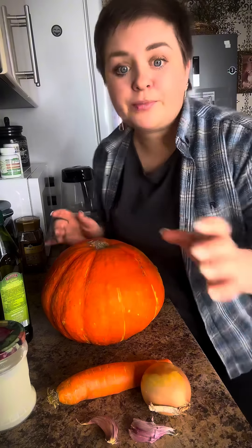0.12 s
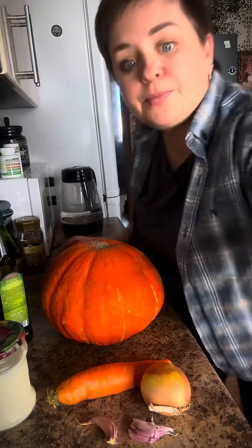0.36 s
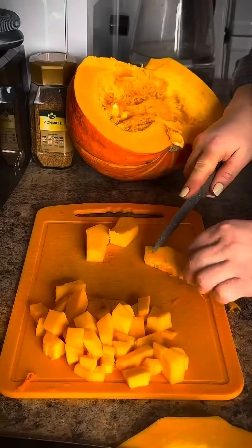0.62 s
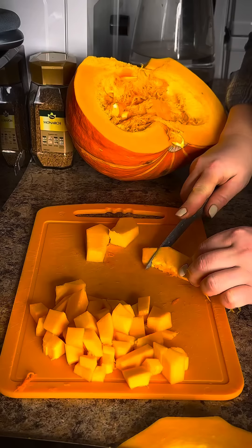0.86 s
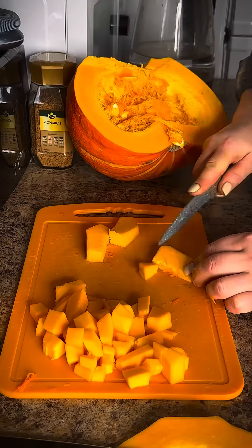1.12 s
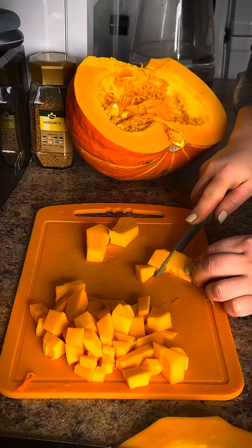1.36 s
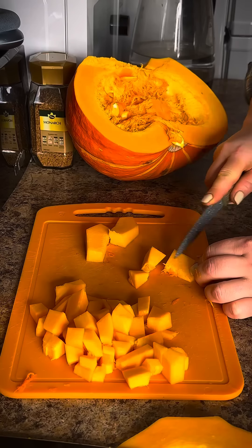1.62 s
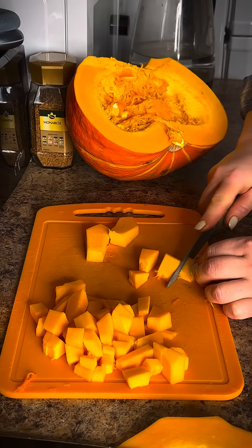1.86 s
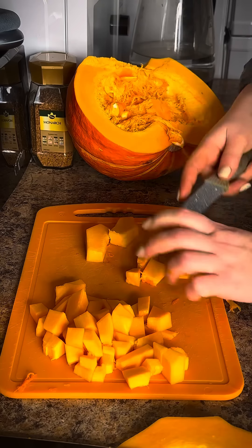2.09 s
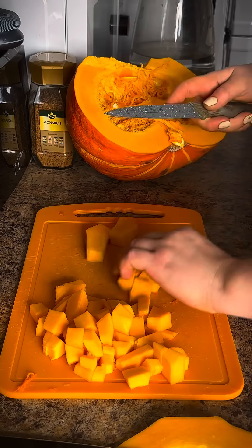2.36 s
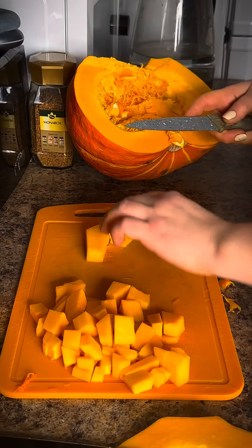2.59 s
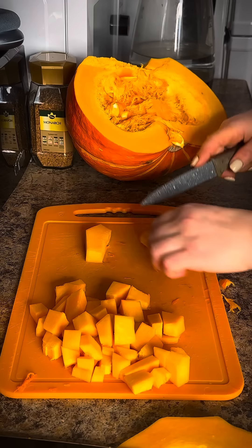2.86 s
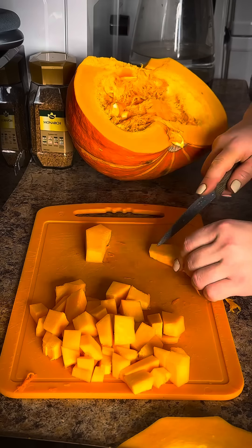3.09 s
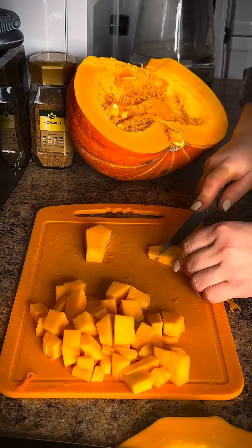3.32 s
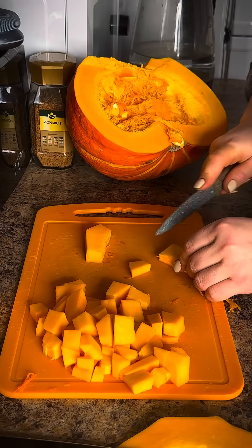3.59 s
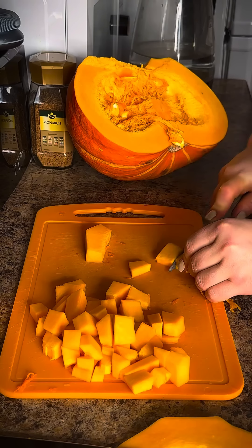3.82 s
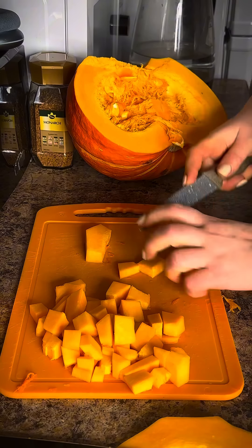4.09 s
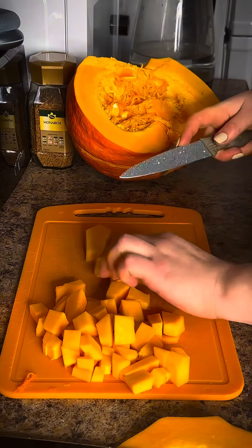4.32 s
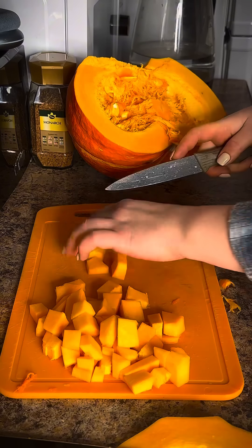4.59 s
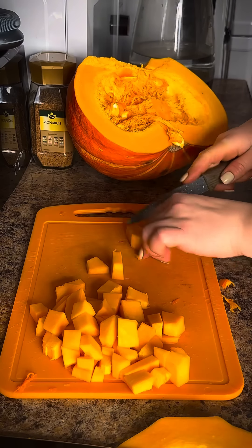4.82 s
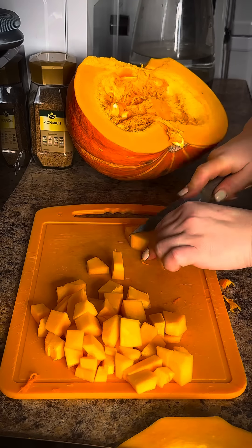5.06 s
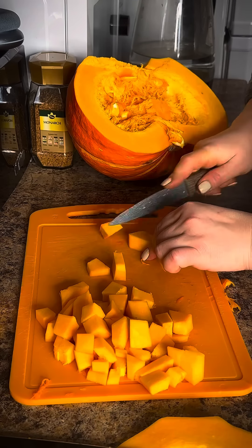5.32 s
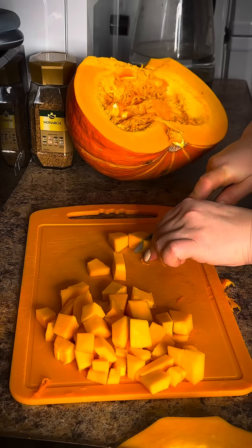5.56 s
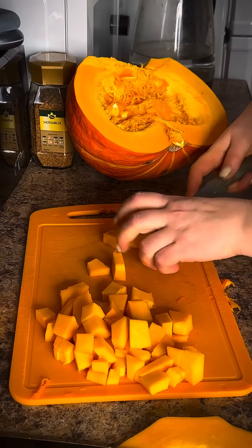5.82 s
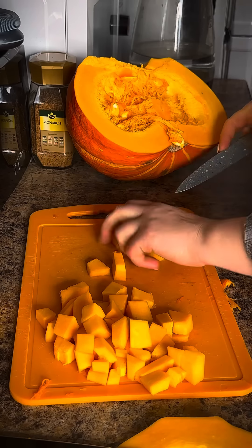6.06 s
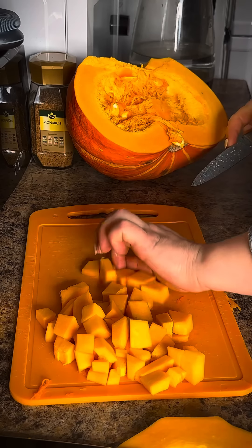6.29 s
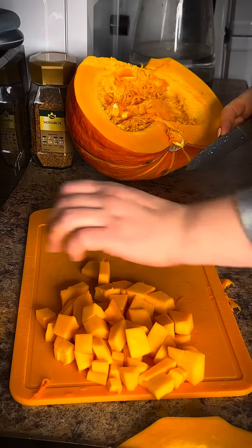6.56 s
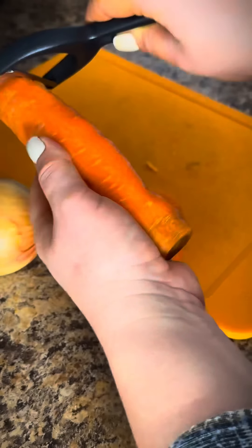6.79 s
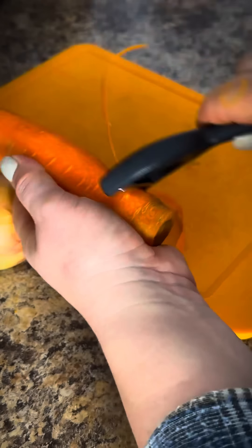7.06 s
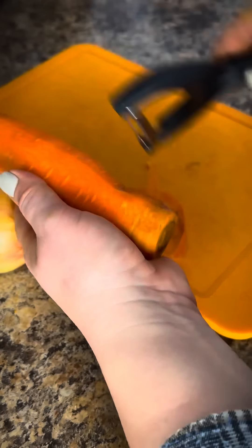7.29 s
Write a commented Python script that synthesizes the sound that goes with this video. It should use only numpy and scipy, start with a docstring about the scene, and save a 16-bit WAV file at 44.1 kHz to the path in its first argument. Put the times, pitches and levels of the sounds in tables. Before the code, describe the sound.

A knife chops firm vegetable on a plastic board with hollow knocks, pieces sliding between, then a peeler rasps once along a carrot in a quiet kitchen.

```python
"""A knife dices firm vegetable on a plastic board: each blow rings the board's modes as decaying sines.
Stick-slip grains make the blade's rasp and the sliding of pieces; soft drops, ticks and hiss lie between.
A peeler then gives a touch and one long stroke of dense tearing grains, and a falling squeak.
A small kitchen adds its diffuse tail; dull bumps come through the counter over air noise and a faint hum.
Two close microphone ports hear it, after an early cut from a wider shot to the board."""
import sys
import numpy as np
from scipy import signal
from scipy.fft import rfft, irfft
from scipy.io import wavfile

SR = 44100
rng = np.random.default_rng(int(sys.argv[2]) if len(sys.argv) > 2 else 0)


def master_out(mix):
    """Clip the mix to full scale and print it as 16-bit PCM to the path in sys.argv[1]."""
    frames = np.transpose(np.atleast_2d(mix))
    ceiling = np.clip(frames, -1, 1)
    pcm = np.round(ceiling * 32767).astype(np.int16)
    wavfile.write(sys.argv[1], SR, pcm)


def level_to_linear(level):
    """Convert decibel levels to linear amplitude factors, elementwise."""
    exponent = np.asarray(level, float) / 20
    return 10 ** exponent


N = 327222   # length [samples]
CLOSE_SHOT_S = .572   # the scene cuts to a closer microphone position at the board


def rms_one(x):
    """Power normalisation: scales a signal to rms 1."""
    return x / np.sqrt(np.mean(x ** 2) + 1e-20)


def at_hz(points, hz):
    """Logarithmic pitch scale: interpolates a table's second column over log frequency."""
    points = np.array(points)
    return np.interp(np.log(hz), np.log(points[:, 0]), points[:, 1])


def bin_hz():
    """Fourier analysis: bin frequencies [Hz], kept above zero for the logarithm."""
    return np.maximum(np.fft.rfftfreq(N, 1 / SR), 1)


def low_pass(x, hz, order=2):
    """Low-pass filtering: a Butterworth slope above hz."""
    return signal.sosfilt(signal.butter(order, hz, fs=SR, output="sos"), x)


def band_pass(x, low_hz, high_hz, order):
    """Band-pass filtering: Butterworth slopes on both sides."""
    return signal.sosfilt(signal.butter(order, [low_hz, high_hz], "band", fs=SR, output="sos"), x)


def fading(bursts, time_s):
    """Exponential decay: each click falls to 1/e of its height in time_s."""
    return signal.lfilter([1], [1, -np.exp(-1 / (time_s * SR))], bursts + 1e-18)


def drift(rate_hz):
    """Slow random modulation: twice low-passed noise of rms 1, made at every 20th sample."""
    pole = np.exp(-40 * np.pi * rate_hz / SR)
    noise = rng.standard_normal(N // 20 + 2002)
    slow = signal.lfilter([1], [1, -2 * pole, pole * pole], noise)[2000:]
    return np.interp(np.arange(N) / 20, np.arange(len(slow)), rms_one(slow))


def ring(clicks, hz, t60):
    """Modal resonance: a unit click sets off a sine of height 1 that falls 60 dB in t60 [s]."""
    radius, angle = level_to_linear(-60 / (t60 * SR)), 2 * np.pi * hz / SR
    return signal.lfilter([0, np.sin(angle)], [1, -2 * radius * np.cos(angle), radius ** 2], clicks + 1e-18)


def grains(per_s, spread_db):
    """Stick-slip friction: clicks of random time, sign and size."""
    sizes = level_to_linear(spread_db * np.minimum(rng.exponential(1, N), 5)) * rng.choice([-1, 1], N)
    return sizes * (rng.random(N) < per_s / SR)


def coloured(x, spectrum):
    """Spectral shaping: filters a noisy signal by a spectrum and scales it to rms 1."""
    return rms_one(irfft(rfft(x) * level_to_linear(at_hz(spectrum, bin_hz())), N))


def stroke(start, length, shares, db, touch_s=0.004, leave_s=0.073):
    """Contact force as gain: levels in dB at shares of the length, joined to silence at either edge."""
    s = start + length * np.maximum.accumulate(np.clip(shares, 0, 1))
    times = np.r_[start - touch_s, s, s[-1] + leave_s]
    return level_to_linear(np.interp(np.arange(N) / SR, times, np.r_[-110, db, -110]))


# modes of the board on its counter, also excited by taps and rubbing:
# (frequency [Hz], relative level [dB], t60 when left free [s])
BOARD_MODES = [(113, -25, 0.025), (279.7, -22, 0.25), (454, -6.5, 0.024), (675.8, 0, 0.041),
               (824.7, 0, 0.026), (1166, -3, 0.0087), (1399, -3.5, 0.031), (1560, -10, 0.042),
               (1748, -3.5, 0.031), (1932, -3.5, 0.023), (2198, 0.5, 0.016), (2700, 0, 0.0065),
               (3010, 1, 0.01), (3460, -3, 0.0041), (4077, -7, 0.0075), (4565, -11.5, 0.0073),
               (4880, -11, 0.011), (6060, -8.5, 0.0027), (6280, -12, 0.014), (7140, -2, 0.0024),
               (8900, -17.5, 0.013)]
# splitting fibres: (frequency [Hz], relative density [dB])
FIBRE_CRACK = [(290, -41), (500, -4.5), (753, -8.5), (1040, -22.5), (1790, -13), (2540, 6), (6560, -15.5),
               (11400, -46), (14700, -42), (16500, -42.5)]
# blade landings: (time [s], level [dB], low-mode tilt [dB], treble tilt [dB], favoured frequency [Hz])
CHOPS = [(0.862, -1.5, -19, -6, 1800), (1.336, -3, -21.5, -6, 1930), (1.808, -1, -25, -6.5, 1970),
         (2.281, -20.5, -21.5, 8.5, 1730), (3.346, -6, -22, -12, 1850), (3.819, -6, -16.5, 1, 1710),
         (4.018, -32.5, -14, 1, 2190), (4.613, -21, -15, -16.5, 1670), (5.121, 0, -24.5, -9.5, 2250),
         (5.582, -3, -19, -3.5, 1900)]


def chops(rebound_db=-15.0, low_hz=1000, bright_hz=3200, contact_hz=5000, settle_hz=500, focus_db=7.0,
          crack_db=-13):
    """Impact excitation of modes: the edge lands over a few ms, low modes respond softly, fibres crack."""
    times, levels, low_tilt, treble_tilt, favoured_hz = np.array(CHOPS).T
    luck = rng.normal(0, 2.0, (len(times), len(BOARD_MODES)))
    lags = rng.uniform(.0015, .005, (len(times), 2))   # later parts of the edge
    at = times + 0.00098
    knocks = np.zeros(N)
    for k, (hz, level_db, t60) in enumerate(BOARD_MODES):
        if hz < low_hz:
            tilt_db = low_tilt + 18
        elif hz > bright_hz:
            tilt_db = treble_tilt + 14
        else:
            tilt_db = 0
        # the spot struck favours some modes
        tilt_db = tilt_db + focus_db * np.exp(-(np.log2(hz / favoured_hz) / 0.27) ** 2)
        size = level_to_linear(levels - 9.5 + level_db + tilt_db + luck[:, k])
        clicks = np.zeros(N)
        clicks[(at * SR).astype(int)] = size * (-1) ** k
        for lag in lags.T:
            clicks[((at + lag) * SR).astype(int)] += size * level_to_linear(rebound_db)
        # the blade stays down and damps the quick modes
        pressed = .65 * t60 if hz > low_hz else t60
        knocks += ring(low_pass(clicks, settle_hz if hz < low_hz else contact_hz), hz, pressed)
    burst = np.zeros(N)
    burst[(at * SR).astype(int)] = level_to_linear(levels + crack_db + .5 * treble_tilt)
    return knocks + fading(burst, .004) * coloured(rng.standard_normal(N), FIBRE_CRACK)


# torn flesh and dragged pieces: (frequency [Hz], relative density [dB])
RUB_HISS = [(1470, -30.5), (2500, -2.5), (5870, -4.5), (8640, -15.5), (10600, -23), (11700, -81),
            (13500, -28), (15100, -18.5), (16100, -25.5), (16500, -53)]
# blade pushed through the flesh: (start [s], length [s], rasp level [dB], hiss re rasp [dB])
CUTS = [(0.771, .087, -45.5, -9.5), (1.225, .106, -44.5, -9.5), (1.723, .081, -43, -7.5),
        (3.261, .083, -46, -7), (3.748, .066, -42.5, -6.5), (5.045, .071, -40.5, -10.5),
        (5.506, .072, -42, -8.5)]
CUT_BITE_DB, CUT_SWELL_SHARE = -12, .55   # at first contact re full force; share of length to full force
CUT_LOW_DB, CUT_HISS_GROWS_DB = -5.5, 4   # lower modes re rasp; hiss growth by the end
# pieces, blade and fingers dragged over the board:
# (start [s], length [s], rasp level [dB], lower modes re rasp [dB], hiss re rasp [dB])
SLIDES = [(0.0, 0.081, -56, 11, -25), (0.383, 0.05, -75.5, 12, -6.5), (.445, .09, -61.5, 4, 1.5),
          (1.688, 0.018, -66, 2, 4), (1.896, 0.093, -54, -5.5, -6.5), (2.344, 0.13, -58.5, 0, 0.6),
          (2.705, 0.035, -56.5, 7.5, -19), (2.741, 0.22, -50, -8, -5.5), (2.973, 0.075, -64.5, -8, 8),
          (3.897, .11, -49.5, -7.5, -7.5), (4.086, 0.17, -72, -13, -7), (4.231, 0.2, -66.5, 0.9, 3),
          (4.636, 0.047, -44.5, -17, -4), (4.728, 0.16, -55, -6, -5.5), (5.233, 0.04, -48.5, -7, -10.5),
          (5.468, 0.021, -60.5, 0.5, -0.2), (5.659, 0.19, -49, -1, -4.5), (5.857, 0.14, -60, -4, -6),
          (6.068, 0.072, -37, -12, -12), (6.152, 0.12, -45, -2.5, -13.5), (6.267, 0.13, -62, 3, 2),
          (6.423, 0.045, -69.5, -1.5, -0.6), (6.625, .18, -77, -0.8, -6)]
SLIDE_START_DB, SLIDE_FADE_DB, SLIDE_TOUCH_S = -7, -12, .015
SLIDE_RISE_SHARE, SLIDE_HOLD_SHARE = 0.29, 0.37   # full force lies between these shares of the length
MODE_PATCHY_DB = 3.5   # the contact wanders, so each mode comes and goes


def rubbing():
    """Stick-slip excitation: dense slips ring the board's modes, and tearing grains add hiss."""
    rasp, drone, hiss = 0, 0, 0
    for start, length, db, hiss_db in CUTS:
        shares = [0, CUT_SWELL_SHARE, 1]
        force = stroke(start, length, shares, db + np.array([CUT_BITE_DB, 0, 0]))
        rasp = rasp + force
        drone = drone + force * level_to_linear(CUT_LOW_DB)
        hiss_levels = db + hiss_db + np.array([CUT_BITE_DB, 0, CUT_HISS_GROWS_DB])
        hiss = hiss + stroke(start, length, shares, hiss_levels)
    for start, length, db, low_db, hiss_db in SLIDES:
        force = stroke(start, length, [0, SLIDE_RISE_SHARE, SLIDE_HOLD_SHARE, 1],
                       db + np.array([SLIDE_START_DB, 0, 0, SLIDE_FADE_DB]), touch_s=SLIDE_TOUCH_S)
        rasp = rasp + force
        drone = drone + force * level_to_linear(low_db)
        hiss = hiss + force * level_to_linear(hiss_db)
    slips = grains(7000, spread_db=3.0) * level_to_linear(2.0 * drift(13))
    lower, upper = 0, 0
    for k, (hz, db, t60) in enumerate(BOARD_MODES):
        mode = level_to_linear(db + MODE_PATCHY_DB * drift(14)) * ring(slips, hz, 1.2 * t60) * (-1) ** k
        if 200 < hz < 1000:
            lower = lower + mode
        elif 1000 < hz < 3200:   # a dragged board sounds mostly from its middle modes
            upper = upper + mode * level_to_linear(7.2 * np.exp(-(np.log2(hz / 1800) / 0.3) ** 2))
    tearing = grains(14000, spread_db=3.0) * level_to_linear(1.5 * drift(27))
    drone = drone * rms_one(low_pass(lower, 1100))
    return rasp * rms_one(upper) + drone + hiss * coloured(tearing, RUB_HISS)


# peeler on the skin, a touch and a stroke: (start [s], loudest [s], end [s], level [dB])
PEEL_STROKES = [(6.744, 6.763, 6.775, -56.5), (6.826, 7.046, 7.18, -42.5)]
PEEL_START_DB, PEEL_END_DB = -9, -9.5   # re the loudest point
# tearing skin: (frequency [Hz], relative density [dB])
PEEL_COLOUR = [(180, -36), (300, -12), (531, -8.5), (2130, -11.5), (2790, -0.5), (4460, -9.5), (8300, -8),
               (10500, -19), (11400, -50), (12800, -21.5), (13500, -11.5), (15200, -12.5), (16500, -23.5)]
PEEL_PATCHY_DB = 2   # the contact wanders, so each band comes and goes
PEEL_BODY_HZ, PEEL_BODY_SWELL = 2000, 1.6   # below this, gain follows the force to this power
SQUEAK_S, SQUEAK_LENGTH_S, SQUEAK_DB = 7.124, 0.051, -45.5
SQUEAK_HZ, SQUEAK_SAG_HZ_PER_S, SQUEAK_WIDTH_HZ = 4150, 10000, 170


def peeler():
    """Friction noise: skin tears in dense grains, the blade chatters and squeaks downward as it leaves."""
    tear = grains(14000, spread_db=2.0) * level_to_linear(1.8 * drift(70))
    force = 0
    for start, loudest, end, db in PEEL_STROKES:
        shares = [0, (loudest - start) / (end - start), 1]
        force = force + stroke(start, end - start, shares, db + np.array([PEEL_START_DB, 0, PEEL_END_DB]))
    t = np.arange(N) / SR - SQUEAK_S
    falling_tone = np.cos(2 * np.pi * (SQUEAK_HZ - SQUEAK_SAG_HZ_PER_S * t / 2) * t)
    squeak = falling_tone * low_pass(rng.standard_normal(N), SQUEAK_WIDTH_HZ / 2)
    swell = stroke(SQUEAK_S, SQUEAK_LENGTH_S, [0, .5, 1], SQUEAK_DB + np.array([-8., 0, -8.]))
    skin = coloured(tear, PEEL_COLOUR)
    # differences of successive low-passes are bands, each with its own drift
    layers = np.array([low_pass(skin, hz) for hz in (2400, 3000, 3700, 4600, 6000, 8000)] + [skin])
    skin = layers[0] + sum(level_to_linear(PEEL_PATCHY_DB * drift(13)) * band for band in np.diff(layers, axis=0))
    body = low_pass(skin, PEEL_BODY_HZ)
    body_force = force * (force / force.max()) ** (PEEL_BODY_SWELL - 1)
    return force * (skin - body) + body_force * body + swell * rms_one(squeak)


# soft pieces and fingers touching down: (time [s], level [dB], treble tilt as hardness [dB])
TAPS = [(0.434, -51.5, -19), (1.094, -38.5, -25), (1.22, -50, -1), (1.564, -43, -22.5), (1.726, -41, 3.5),
        (1.95, -44.5, -3), (2.48, -51.5, -5), (2.547, -42.5, -19.5), (2.703, -49, -1), (2.882, -45, 7),
        (3.2, -52.5, -11), (3.558, -41, -10.5), (3.601, -37.5, -5), (3.725, -36.5, -12), (3.75, -42, 8.5),
        (3.97, -41, -5), (4.355, -36, -0.5), (4.413, -42.5, -20), (4.462, -41, -26), (4.524, -39, -17.5),
        (5.045, -41, 3.5), (5.239, -45.5, -2), (5.47, -42.5, -10.5), (5.508, -39.5, -2), (5.94, -54.5, 6),
        (6.065, -41.5, -6), (6.434, -48.5, -4)]
# squash of a soft landing: (band centre [Hz], t60 [s])
PUFF = [(250, 0.038), (450, 0.12), (800, 0.077), (1400, 0.02), (2400, .008)]


def taps(puff_db=-10.0):
    """Soft impact: contacts ring the board dully and squash with noise bands of unequal decay."""
    times, levels, hardness = np.array(TAPS).T
    at = ((times + 0.00045) * SR).astype(int)
    luck = rng.normal(0, 2.0, (len(times), len(BOARD_MODES)))
    out = np.zeros(N)
    for k, (hz, level_db, t60) in enumerate(BOARD_MODES):
        clicks = np.zeros(N)
        clicks[at] = level_to_linear(levels - 8.5 + level_db + luck[:, k] + hardness * (hz > 1000)) * (-1) ** k
        out += ring(clicks, hz, t60)
    for hz, t60 in PUFF:
        burst = np.zeros(N)
        burst[at] = level_to_linear(levels + puff_db + hardness * (hz > 1000))
        dying = signal.lfilter([1], [1, -level_to_linear(-60 / (t60 * SR))], burst + 1e-18)
        out += dying * rms_one(band_pass(rng.standard_normal(N), hz / 1.35, hz * 1.35, 2))
    return low_pass(out, 2800, order=4)


# small dry ticks of fibres, blade and nails: (time [s], level [dB])
TICKS = [(0.441, -43), (0.4619, -48), (1.2179, -41.5), (1.6851, -53), (2.2394, -64), (4.0177, -29.5),
         (5.4708, -42), (5.7993, -41), (6.7405, -46.5), (6.8236, -40), (7.1794, -42)]
# their noise: (frequency [Hz], relative density [dB])
TICK_COLOUR = [(600, -30), (1200, -9.5), (2500, 0.3), (5000, -2.5), (9000, -11), (15000, -19.5),
               (16500, -49)]


def ticks():
    """Transient noise: bright bursts start at once and decay exponentially."""
    s, db = np.transpose(TICKS)
    burst = np.zeros(N)
    burst[(s * SR).astype(int)] = level_to_linear(db - 6.5)
    return fading(burst, 0.0036) * coloured(rng.standard_normal(N), TICK_COLOUR)


# hiss of things being slid: (start [s], length [s], centre [Hz], width [Hz], level [dB])
SWISHES = [(0.56, 0.14, 2330, 149, -63.5), (1.15, 0.093, 2400, 400, -66.5), (1.15, 0.14, 4980, 600, -71),
           (4.7, 0.53, 2400, 300, -67.5), (4.933, 0.13, 4000, 1495, -74), (2.38, .26, 2315, 500, -61.5),
           (2.966, 0.26, 5830, 1700, -44), (2.963, 0.28, 3360, 2200, -52.5),
           (3.489, 0.17, 4400, 500, -68.5), (4.418, 0.21, 2700, 252, -59), (4.42, 0.27, 5140, 252, -72.5),
           (5.336, 0.13, 5510, 700, -77.5), (5.879, .22, 4630, 450, -45), (5.888, 0.22, 8830, 450, -72.5),
           (6.317, 0.27, 4290, 500, -55), (6.418, 0.3, 5230, 1200, -76), (6.632, .1, 5000, 907, -71),
           (6.679, 0.19, 2900, 900, -69), (6.897, 0.11, 2940, 500, -56), (7.195, 0.38, 3090, 900, -56.5),
           (7.277, 0.17, 5250, 600, -48), (7.282, 0.18, 7820, 600, -65.5)]
SWISH_RISE_SHARE = .22   # share of the length spent swelling
SWISH_START, SWISH_END = 0.32, .2   # size at either end, before squaring


def swishes():
    """Band-limited friction noise: narrow bands swell and fade."""
    out, noise = np.zeros(N), rng.standard_normal(N) * level_to_linear(2 * drift(36))
    for start, length, hz, width_hz, db in SWISHES:
        i, j = int(start * SR), min(int((start + length) * SR), N)
        share = (np.arange(i, j) / SR - start) / length
        shape = np.interp(share, [0, SWISH_RISE_SHARE, 1], [SWISH_START, 1, SWISH_END]) ** 2
        band = band_pass(noise[i:j], hz - width_hz / 2, hz + width_hz / 2, 3)
        out[i:j] += level_to_linear(db) * shape * rms_one(band)
    return low_pass(out, 11000, order=4)


# bumps through the counter: (loudest time [s], level [dB])
BUMPS = [(.015, -43), (.33, -51), (.41, -46), (.5, -48), (.89, -47), (1.24, -45.5), (1.375, -50.5),
         (1.57, -54.5), (1.75, -49.5), (1.835, -47.5), (2.29, -49), (2.56, -58), (2.715, -48.5),
         (2.95, -63.5), (3.37, -48), (3.75, -42), (3.84, -45), (4.05, -58), (4.32, -48), (4.46, -49.5),
         (4.55, -64.5), (4.65, -51), (5.07, -52.5), (5.14, -43), (5.26, -61), (5.48, -51), (5.55, -51),
         (5.6, -43.5), (5.75, -54), (6.035, -49), (6.36, -55.5), (6.66, -56.5), (7.09, -57), (7.32, -56)]
# their noise: (frequency [Hz], relative density [dB])
BUMP_COLOUR = [(30, -56.5), (50, -2.5), (75, -4), (110, 5.5), (140, -2), (200, -15), (300, -15),
               (500, -85.5)]
BUMP_RISE_S, BUMP_T60_S = 0.022, 0.16
RUMBLE_DB, RUMBLE_T60_S = -10.5, .9   # a weaker rumble lingers, re the bump
WOBBLE_S, WOBBLE_HZ, WOBBLE_DB, WOBBLE_T60_S = .283, 48.68, -35, .3   # the microphone's stand is nudged


def bumps():
    """Structure-borne sound: low noise swells, dies and leaves a rumble; a nudged stand resonates."""
    t, size = np.arange(N) / SR, 0
    for s, db in BUMPS:
        after = np.maximum(t - s, 0)
        rise = np.clip(1 + (t - s) / BUMP_RISE_S, 0, 1) ** 2
        rise = rise * ((t < CLOSE_SHOT_S) | (s > CLOSE_SHOT_S))   # bumps of the first shot end at the cut
        thud = level_to_linear(db - 60 * after / BUMP_T60_S)
        rumble = level_to_linear(db + RUMBLE_DB - 60 * after / RUMBLE_T60_S)
        size = size + rise * (thud + rumble)
    nudge = np.zeros(N)
    nudge[int(WOBBLE_S * SR)] = level_to_linear(WOBBLE_DB)
    wobble = ring(low_pass(nudge, WOBBLE_HZ), WOBBLE_HZ, WOBBLE_T60_S)
    lumpy = size * level_to_linear(2.4 * drift(12))
    return lumpy * coloured(rng.standard_normal(N), BUMP_COLOUR) + wobble


# likeness of the two channels, for air and kitchen: (frequency [Hz], correlation [1])
LIKENESS = [(60, 0.92), (250, 0.84), (600, 0.81), (1600, 0.87), (5000, 1), (12000, 0.51)]


def mid_side(mid, side, hz):
    """Interchannel coherence: weights a common and an opposed noise for the likeness at hz."""
    alike = np.clip(at_hz(LIKENESS, hz), -1, 1)
    return np.sqrt(1 + alike) * mid + np.sqrt(1 - alike) * side * [[1], [-1]]


# the kitchen's tail: (frequency [Hz], t60 [s], relative level [dB])
KITCHEN_TAIL = [(100, 0.33, -41), (325, 0.27, 12), (700, 0.37, 2), (1570, 0.31, -4), (3000, 0.38, -2.5),
                (5870, 0.41, -4.5), (8650, 0.11, 10), (14000, 0.14, 3.5)]


def kitchen(x, build_s=0.002):
    """Diffuse reverberation: half-octave noise bands decay at their own rates, partly unlike by side."""
    t, edges = np.arange(SR // 2) / SR, 70 * 2 ** np.arange(0, 8.1, .5)
    white, tail, table = rng.standard_normal((2, 2, len(t))), 0, np.array(KITCHEN_TAIL)
    for k, (low, high) in enumerate(zip(edges, edges[1:])):
        mid, side = band_pass(white[k % 2], low, high, 2)
        hz = np.sqrt(low * high)
        dying = level_to_linear(at_hz(table[:, ::2], hz) - 60 * t / at_hz(table, hz))
        tail = tail + dying * mid_side(mid, side, hz)
    return signal.fftconvolve(x[None], tail * (1 - np.exp(-t / build_s)))[:, :N]


def diffuse(spectrum):
    """Diffuse-field noise: stereo of rms 1 whose channels agree as the likeness table says."""
    mid, side = rfft(rng.standard_normal((2, N))) * level_to_linear(at_hz(spectrum, bin_hz()))
    return rms_one(irfft(mid_side(mid, side, bin_hz()), N))


# room air and appliances at the wider first position, then at the board:
# (frequency [Hz], relative density [dB])
AIR_FAR = [(15, -14), (25, 3.5), (134, -9), (384, -17.5), (531, -8), (624, -23), (936, -14.5), (1070, -24),
           (2160, -30), (2760, -32), (6380, -35), (7110, -50), (12900, -53), (16000, -69.5)]
AIR_NEAR = [(15, -31.5), (25, 6.5), (111, 2.5), (223, -3.5), (285, -0.5), (373, -14), (796, -14),
            (988, -20), (2350, -20), (3200, -32), (5140, -41), (8830, -45.5), (10700, -71.5), (16000, -57)]


def air(far_db=-55, near_db=-63, hum_hz=49, hum_db=-69.5):
    """Stationary noise: coloured air of either microphone position over a drifting mains sine."""
    is_far = np.arange(N) < CLOSE_SHOT_S * SR
    sine = np.sqrt(2) * np.sin(2 * np.pi * hum_hz * np.arange(N) / SR)
    hum = level_to_linear(hum_db + 1.5 * drift(1.7)) * sine
    far = level_to_linear(far_db) * diffuse(AIR_FAR)
    near = level_to_linear(near_db + 2.9 * drift(3)) * diffuse(AIR_NEAR)
    return hum + np.where(is_far, far, near)


# left port re right: (frequency [Hz], level [dB])
PORT_BALANCE = [(60, 0.), (420, -.3), (680, 5.), (1050, 0.), (4000, -.2), (15000, 0.)]
# left port re right: (frequency [Hz], phase [rad])
PORT_PHASE = [(60, .06), (150, .15), (300, .25), (650, .6), (1100, .2), (1800, -.2), (3000, -.2),
              (5500, -.5), (8500, -1.9), (12000, -2.3)]
# gain of what both ports share, at the board and at the first position: (frequency [Hz], gain [dB])
SHARED_COLOUR = [(850, -1.5), (1020, -4.5), (1200, -0.5), (10200, 1), (10800, -21), (13000, -26.5),
                 (13600, -1.5)]
SHARED_COLOUR_FAR = [(6600, -2.5), (7000, -19), (8900, -17), (9300, 4.5), (13800, 12), (14300, -20.)]


def ports(x):
    """Interference at two ports: level and phase differ, and the shared part is coloured by position."""
    hz = bin_hz()
    left = level_to_linear(at_hz(PORT_BALANCE, hz) / 2) * np.exp(.5j * at_hz(PORT_PHASE, hz))
    pair = rfft(x) * np.array([left, 1 / left]) * 2 / abs(left + 1 / left)
    shared = pair.mean(axis=0)
    far, near = (irfft(pair + shared * (level_to_linear(at_hz(colour, hz)) - 1), N)
                 for colour in (SHARED_COLOUR_FAR, SHARED_COLOUR))
    return np.where(np.arange(N) < CLOSE_SHOT_S * SR, far, near)


def scene(kitchen_db=-42.5):
    """Superposition: direct sound, reverberation and air reach the ports; bumps join both alike."""
    near = chops() + taps() + ticks() + rubbing() + swishes() + peeler()
    # a small board radiates no deep bass
    near = signal.sosfilt(signal.butter(4, 85, "high", fs=SR, output="sos"), near)
    return ports(near + level_to_linear(kitchen_db) * kitchen(near) + air()) + bumps()


def band_limit(x):
    """A steep low-pass at the top of the band."""
    return signal.sosfilt(signal.butter(12, 16950, fs=SR, output="sos"), x)


def record(dry):
    """High-pass response: the microphone drops the deepest bass."""
    heard = signal.sosfilt(signal.butter(4, 40, "high", fs=SR, output="sos"), dry)
    return band_limit(heard)


dry = scene()
out = record(dry)
master_out(out)
```